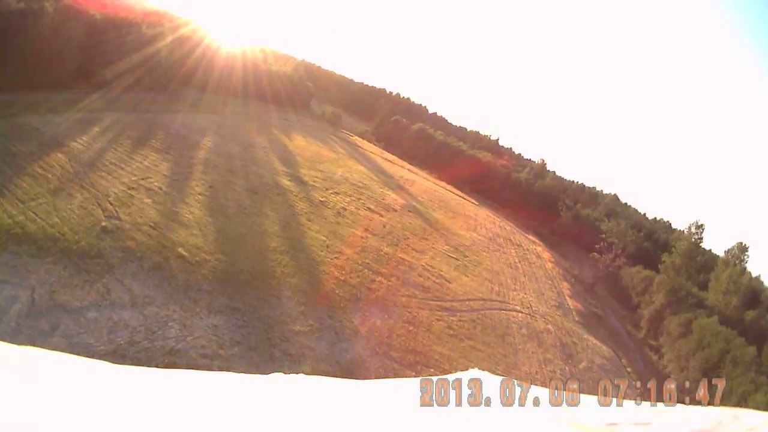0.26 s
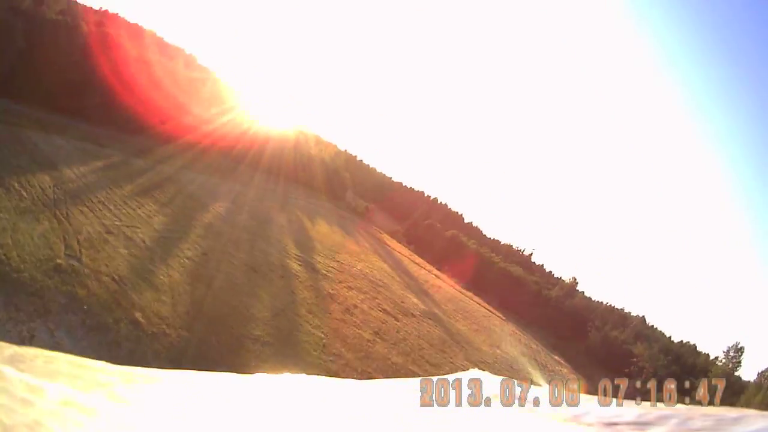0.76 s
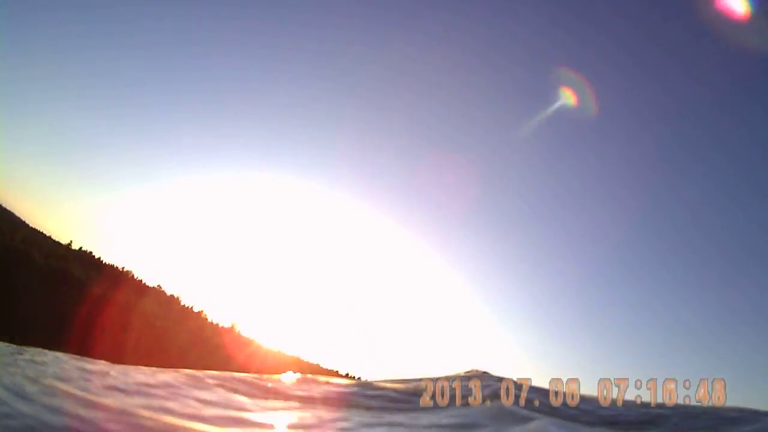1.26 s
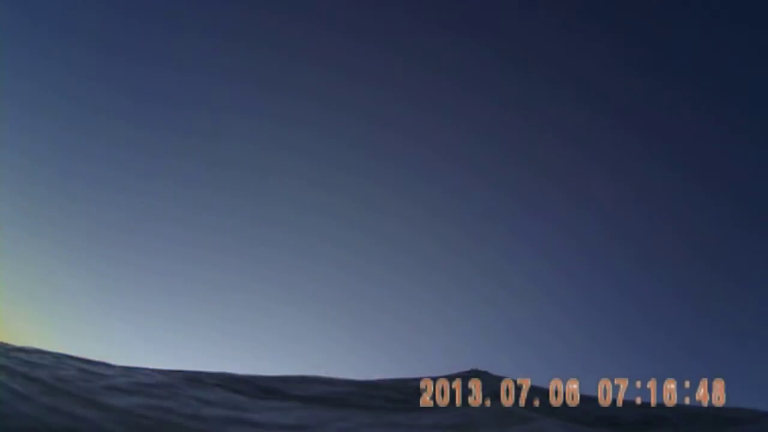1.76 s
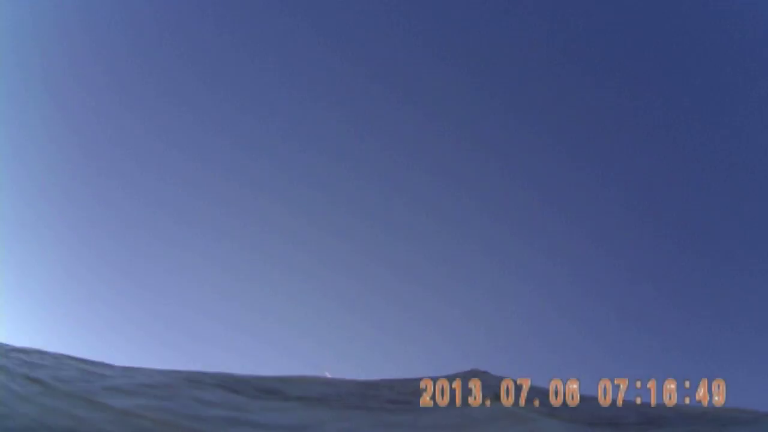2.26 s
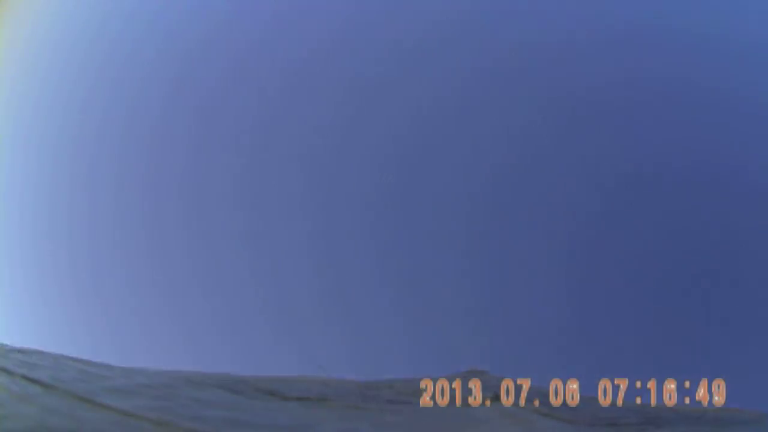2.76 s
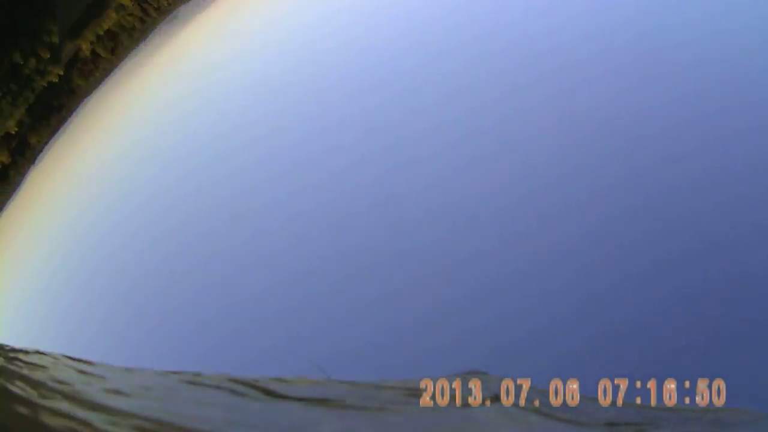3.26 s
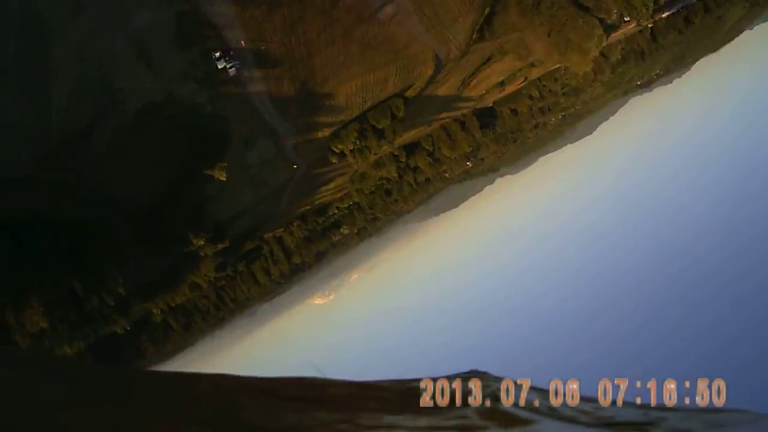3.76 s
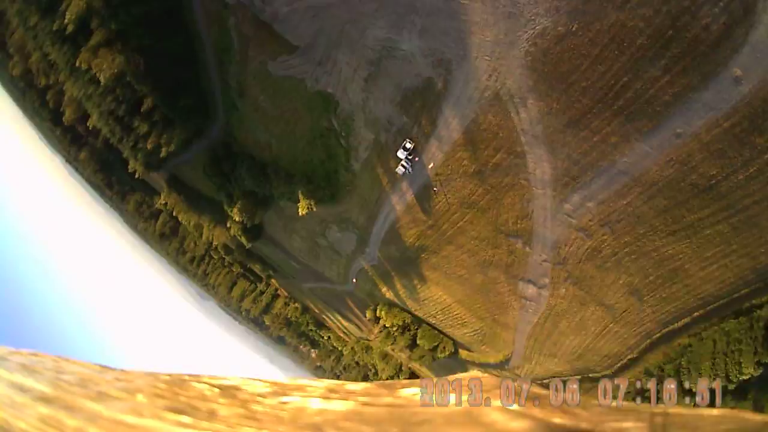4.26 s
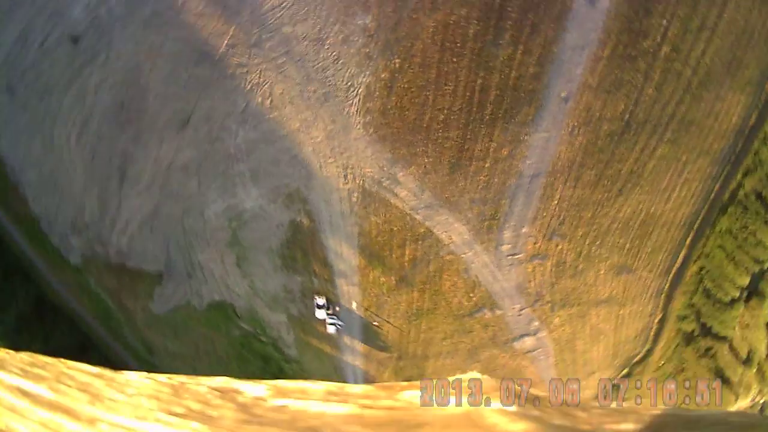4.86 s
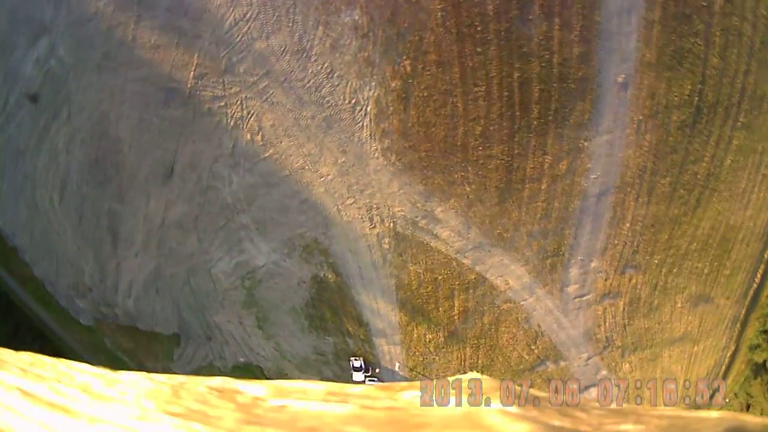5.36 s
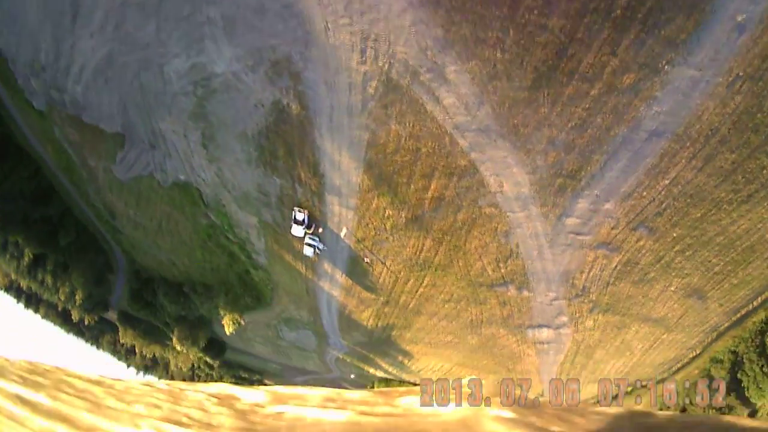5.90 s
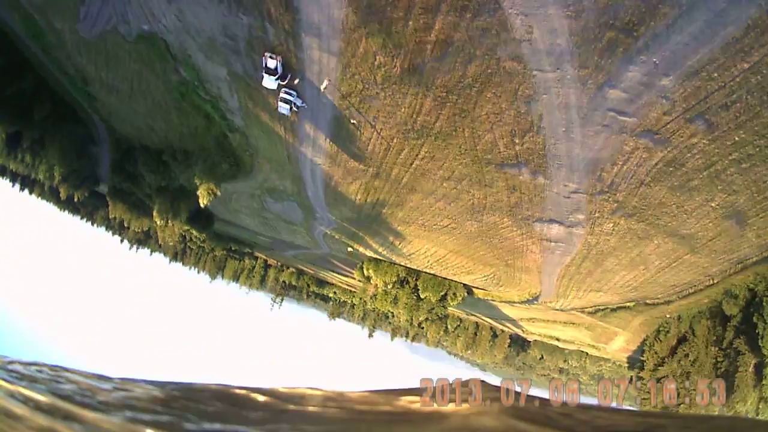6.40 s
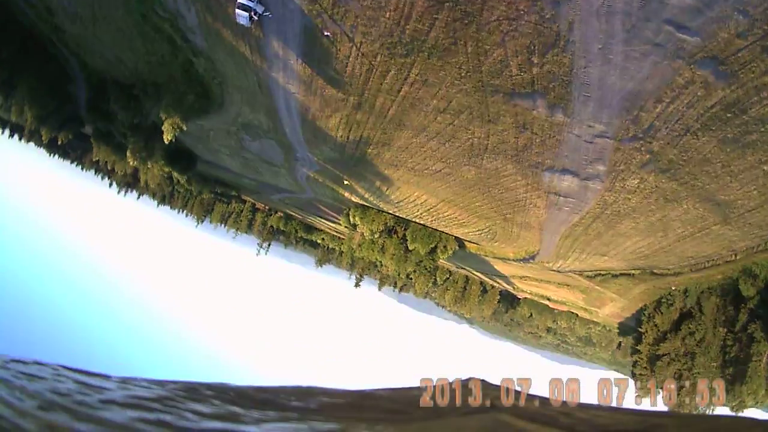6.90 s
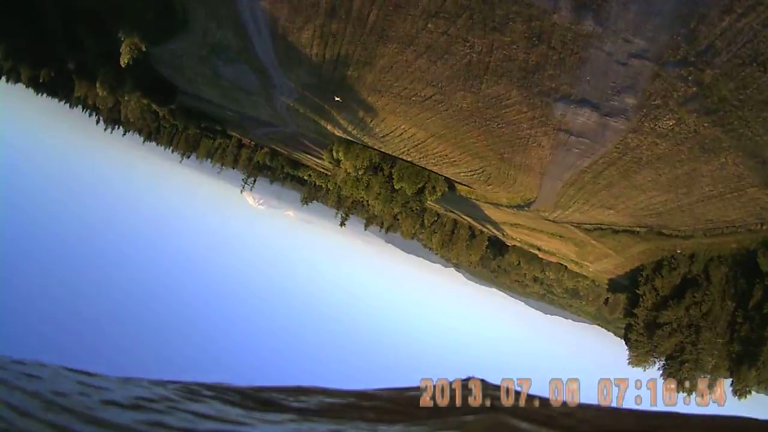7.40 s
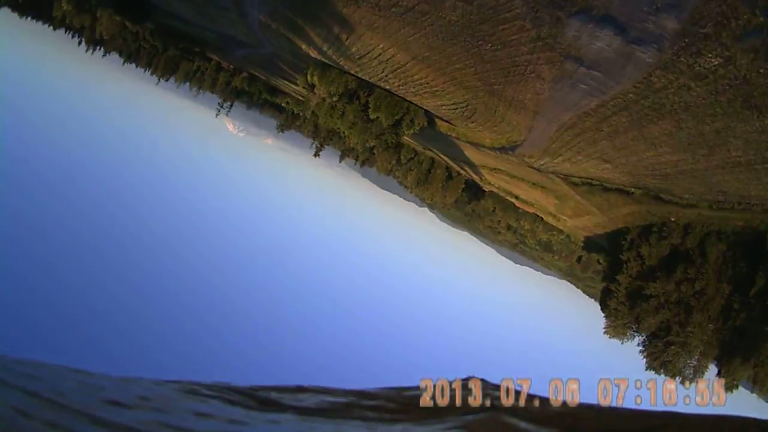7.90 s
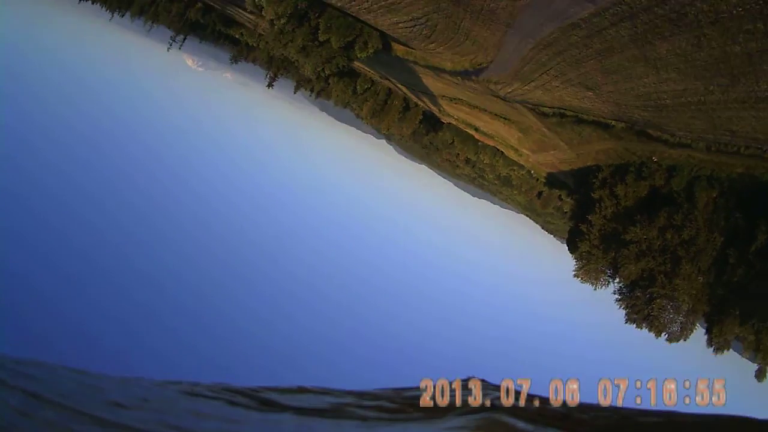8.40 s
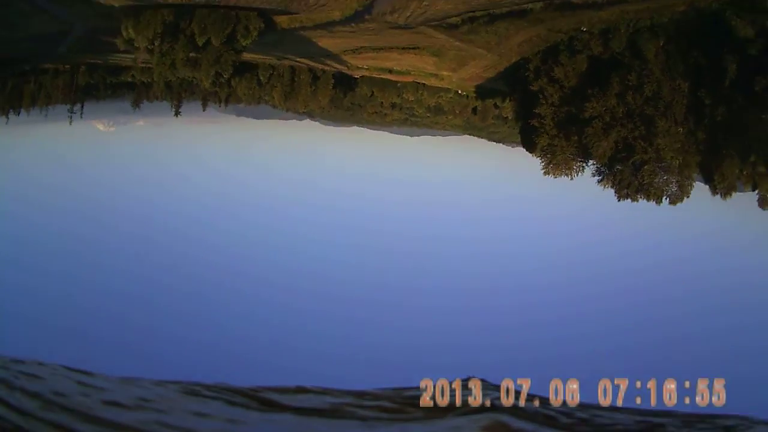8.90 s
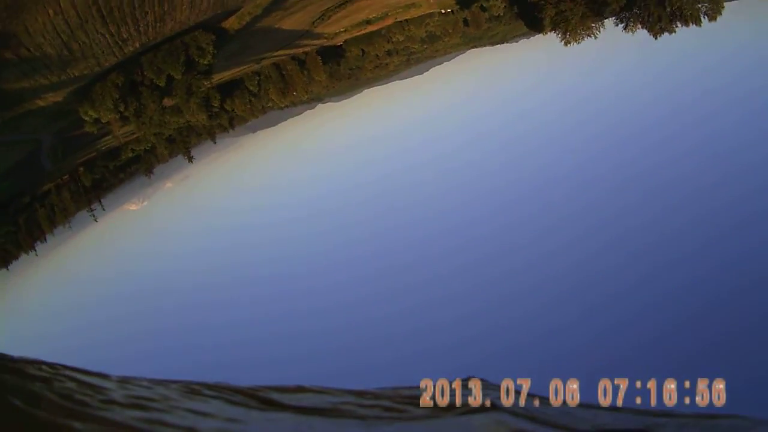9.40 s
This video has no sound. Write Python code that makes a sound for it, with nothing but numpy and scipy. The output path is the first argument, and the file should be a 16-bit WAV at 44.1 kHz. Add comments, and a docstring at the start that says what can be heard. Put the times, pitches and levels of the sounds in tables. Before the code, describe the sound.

On the wing of a small electric model aircraft, a tiny camera microphone catches a harsh propeller buzz and a rumbling rush of wind. Both weaken as the plane slows in a climb, leaving a thinner drone. The motor is throttled back to a lower pitch, the wind swells in the dive, then gradually eases. The sound is boxy and telephone-like, with faint crackle on loud peaks.

```python
"""In open air, on the wing of a small electric model aircraft in flight, heard through a tiny camera.
Each of the two propeller blades throws a sharp suction pulse, built from partials, with a puff of hiss.
The motor whines faintly and is throttled back midway through the flight.
Air rushes over the microphone as coloured noise, fading at the slow top of a climb and swelling in
the dive; the camera narrows the band, and loud peaks overload."""
import sys
import numpy as np
from scipy import signal
from scipy.fft import rfft, irfft, next_fast_len
from scipy.io import wavfile
from scipy.ndimage import uniform_filter1d

SR = 44100
rng = np.random.default_rng(int(sys.argv[2]) if len(sys.argv) > 2 else 0)


def persist_wave(psi):
    """Save psi, clipped to +-1, as 16-bit WAV."""
    counts = np.round(np.clip(psi, -1, 1) * 32767).astype(np.int16)
    wavfile.write(sys.argv[1], SR, np.atleast_2d(counts).T)


N = 425550


def from_db(db):
    """Decibels to gain."""
    return 10 ** (np.asarray(db) / 20)


def rms_one(x):
    """Scale to unit power."""
    return x / np.sqrt(np.mean(x ** 2) + 1e-20)


def in_time(rows):
    """Each column of a curve, drawn as straight lines through its times, at every sample."""
    seconds, *columns = np.transpose(rows)
    return [np.interp(np.arange(N) / SR, seconds, column) for column in columns]


def drift(rate):
    """Smooth random wander of spread 1 that changes about rate times a second."""
    # the wander runs at one fortieth of the sample rate; its first 2000 steps settle the filter
    pole = np.exp(-80 * np.pi * rate / SR)
    steps = rng.standard_normal(N // 40 + 2002)
    slow = signal.lfilter([1], [1, -2 * pole, pole * pole], steps)[2000:]
    return np.interp(np.arange(N) / 40, np.arange(len(slow)), rms_one(slow))


def coloured(x, spectrum):
    """Give a noise the spectrum of a table, nearly silent outside it; rms 1."""
    size = next_fast_len(N)
    hz, db = np.transpose(spectrum)
    bins_hz = np.maximum(np.arange(size // 2 + 1) * SR / size, 1)
    gain = from_db(np.interp(np.log(bins_hz), np.log(hz), db, left=-80, right=-80))
    return rms_one(irfft(rfft(x, size) * gain, size)[:N])


def hump(middle_s, length_s):
    """A smooth rise to 1 and fall back to 0."""
    position = (np.arange(N) / SR - middle_s) / length_s
    return np.cos(np.pi * np.clip(position, -.5, .5)) ** 2


def shaft_angle(flutter_hz, jitter_rad):
    """The shaft follows the throttle; eddies nudge its speed and the arrival of each pulse."""
    # Speed of the motor shaft. Each row: time in seconds, turns per second in Hz.
    shaft_speed = [(0, 190.5), (0.25, 190.6), (1, 189.1), (1.55, 186.0), (2.25, 181.2), (2.85, 179.3),
                   (3.95, 178.9), (4.48, 180.2), (4.62, 180.9), (4.79, 168.5), (5, 169.7), (5.13, 164.2),
                   (5.27, 163.4), (5.85, 167.7), (6.78, 168.0), (6.96, 170.7), (7.1, 171.2), (7.9, 169.7),
                   (8.7, 168.0), (9.65, 168.6)]
    turns_hz = in_time(shaft_speed)[0] + flutter_hz * drift(11.6)
    return 2 * np.pi * np.cumsum(turns_hz) / SR + jitter_rad * drift(150)


def order_db(table, order, eased):
    """Level of one shaft order between full power (0) and throttled back (1)."""
    orders, full_db, back_db = np.transpose(table)
    return (1 - eased) * np.interp(order, orders, full_db) + eased * np.interp(order, orders, back_db)


def swell_db(order):
    """How far single partials swell or fade for a moment, most as the aircraft rolls into the dive."""
    # Each row: middle in seconds, length in seconds, shaft order, lift at the middle in dB.
    swells = [(2.6, 1.6, 2, -4), (3.8, 0.98, 2, 1.5), (4.0, .4, 4, -6), (4.4, 0.93, 16, -13),
              (4.47, .7, 3, 13), (4.5, 0.83, 4, 6.5), (4.5, 1.2, 5, 11), (4.85, 0.63, 4, -8.5),
              (4.998, .9, 18, -10), (5.33, 0.52, 4, -12.5), (5.35, 0.52, 6, 6.5), (5.5, 2.5, 3, -8),
              (6.0, .7, 5, -11), (6.5, 1.2, 1, -5), (6.9, 0.27, 3, 5), (8.5, 3, 4, 3), (9.1, 0.86, 3, 5),
              (9.4, 1.8, 2, -3)]
    return sum(db * hump(s, length_s) for s, length_s, k, db in swells if round(k) == order)


def propeller(angle, wind_db, dip_db, lead_rad, smear_rad, whine_lag_rad, rough,
              drone_waver_db, waver_db, odd_waver_db):
    """Pressure builds ahead of a blade and snaps to suction as it passes: all orders dip nearly together."""
    # Drone of the low orders. Each row: shaft order, level at full power in dB,
    # level throttled back in dB, gain per dB of wind in dB.
    drone_rows = [(1, -19.5, -22.5, 0.42), (2, -23.5, -23, .13), (3, -37, -32.5, 0.2),
                  (4, -18.5, -22, 0.77), (6, -23.5, -27.5, .43)]
    # Colour of the blade pulse. Each row: shaft order, relative level at full power in dB,
    # relative level throttled back in dB.
    pulse_colour = [(7.3, 2.5, 2), (10, 0, -5), (11.8, -1, -9.5), (14.3, -4.5, -16.5), (16.6, -7, -21.5),
                    (18.33, -0.5, 3), (20.9, -3, -2), (23.1, -23, 1)]
    # Odd orders from unequal blades. Each row: shaft order, relative level at full power in dB,
    # relative level throttled back in dB.
    unequal_colour = [(5.05, -5.5, 5), (7.15, -5, -3), (9, -9.5, -12.5), (11.1, -8, -10),
                      (15.2, -12, -22.5), (19, -14, -23), (20.6, -12, -8)]
    throttle_back_s, throttle_takes_s = 4.6, 0.66
    # throttled back, the buzz holds partly (share) to its level at this wind
    cruise_db, eased_steady = -7, .55
    # level in fast flight (dB), and dB gained per dB of wind
    edge_level_db, edge_follows = -27.5, 0.58
    high_whine_db, high_whine_follows = -34, 0.78
    unequal_db = -38.5  # the difference between the blades does not depend on the wind
    wobble_lag_rad = 2.37  # the once-per-turn wobble trails the blade pulse

    eased = np.clip((np.arange(N) / SR - throttle_back_s) / throttle_takes_s, 0, 1)
    drone_db = {}
    for k, full_db, back_db, follows in drone_rows:
        drone_db[round(k)] = full_db + (back_db - full_db) * eased + follows * wind_db
    load_db = wind_db + eased_steady * eased * (cruise_db - wind_db)
    edge_db = edge_level_db + edge_follows * load_db + dip_db
    whine_db = high_whine_db + high_whine_follows * load_db

    pulses = np.zeros(N)
    for order in range(1, 23):
        # the pulse is smeared into a short upward chirp
        phase = order * angle + lead_rad - smear_rad * (order / 10 - 1) ** 2
        if order % 2 and order > 1:
            # the blades are not exactly opposite, which puts odd orders a quarter cycle behind
            phase = phase - np.pi / 2
        if order == 1:
            phase = phase - wobble_lag_rad

        if order in drone_db:
            level_db = drone_db[order] + drone_waver_db * drift(5.8)
        elif order % 2:
            level_db = unequal_db + order_db(unequal_colour, order, eased) + odd_waver_db * drift(3.6)
        elif order < 18:
            level_db = edge_db + order_db(pulse_colour, order, eased) + waver_db * drift(4)
        else:
            # on lightly loaded blades the high whine trails the pulse
            phase = phase - whine_lag_rad * eased * order
            level_db = whine_db + order_db(pulse_colour, order, eased) + waver_db * drift(1.7)
        amplitude = np.sqrt(2) * from_db(level_db + swell_db(order))
        pulses -= amplitude * np.cos(phase)
    # the blades cut through eddies, so no two pulses are equally strong
    return pulses * (1 + rough * drift(280))


def motor(angle):
    """The motor sings faintly at high multiples of its shaft speed."""
    # Thin whine of the motor itself. Each row: shaft order, level in dB.
    whine_partials = [(38, -49), (60, -54), (62, -51), (64, -50), (66, -50)]
    return sum(np.sqrt(2) * from_db(db) * np.sin(order * angle) for order, db in whine_partials)


def blade_puffs(angle, steady, sharpness, uneven):
    """White noise of even power that flares at each blade passage; one blade puffs harder."""
    flare = np.exp(sharpness * (np.cos(2 * angle) - 1))
    gate = steady + flare * (1 + uneven * np.cos(angle))
    return rng.standard_normal(N) * gate / np.sqrt(uniform_filter1d(gate ** 2, size=2048))


def airstream(angle, wind_db, inflow_db, dip_db, lumpy_db, gusty_db, steady):
    """Eddies thump on the microphone port; faster flight fills in steady hiss between the blade puffs."""
    # Noise colours: low thumping, broad rush and blade hiss.
    # Each row: frequency in Hz, relative level in dB.
    buffet_colour = [(15, -24.5), (30, -1.5), (60, 3), (110, 5.5), (180, 3.5), (280, -1), (400, -12),
                     (700, -38)]
    rush_colour = [(150, -24.5), (260, -2.5), (340, -0.5), (500, -3.5), (750, -7.5), (1100, -11.5),
                   (1400, -14), (2200, -23)]
    hiss_colour = [(700, -17), (1200, -11), (1600, -1), (2500, 4), (3200, 0.5), (3700, 2.5), (4000, 3.5)]
    # level in fast flight (dB), and dB gained per dB of wind
    buffet_level_db, buffet_follows = -15, .95
    rush_level_db, rush_follows = -18.5, 1.11
    hiss_level_db, hiss_follows = -28, 0.64

    buffet_db = buffet_level_db + buffet_follows * wind_db + lumpy_db * drift(25)
    buffet = coloured(rng.standard_normal(N), buffet_colour) * from_db(buffet_db)

    rush_db = rush_level_db + rush_follows * wind_db + gusty_db * drift(9.1)
    rush = coloured(rng.standard_normal(N), rush_colour) * from_db(rush_db)

    airspeed = from_db(wind_db / 2)  # relative to fast flight
    puffs = blade_puffs(angle, steady * airspeed, sharpness=4.3, uneven=0.34)
    hiss_db = hiss_level_db + hiss_follows * inflow_db + dip_db
    return buffet + rush + coloured(puffs, hiss_colour) * from_db(hiss_db)


def scene():
    """Propeller, motor and airstream at the wing, in open air; airspeed drives blades and air."""
    # Airspeed, as the level of the wind on the wing relative to fast flight.
    # Each row: time in seconds, level in dB.
    airspeed_curve = [(0, 0), (0.6, -0.5), (1.5, -2.5), (2, -7), (2.6, -13), (3.5, -18.5), (4.1, -15.5),
                      (4.55, -12.5), (4.851, -7.5), (5.6, -5.5), (7, -4.5), (8.4, -8), (9.65, -12)]
    blade_lag_s = 0.11  # the sound of the blades follows the wind a moment later

    angle = shaft_angle(flutter_hz=.09, jitter_rad=0.003)
    wind_db = in_time(airspeed_curve)[0]
    inflow_db = in_time([(s + blade_lag_s, db) for s, db in airspeed_curve])[0]
    # the treble dips briefly over the top of the climb
    dip_db = -0.5 * hump(middle_s=4.3, length_s=0.74)

    # the odd orders waver most
    blades = propeller(angle, inflow_db, dip_db, lead_rad=0.4, smear_rad=1.36, whine_lag_rad=.25,
                       rough=0.056, drone_waver_db=1.25, waver_db=0.74, odd_waver_db=3)
    air = airstream(angle, wind_db, inflow_db, dip_db, lumpy_db=0.78, gusty_db=1.38, steady=2.1)
    return (blades + motor(angle) + air)[None]


def record(dry):
    """The camera rounds big peaks and passes a telephone-like band; what overshoots clips with a faint crackle."""
    camera_rate_hz, camera_top_hz, cutoff_hz = 8000, 3892, 15800
    headroom, ceiling = from_db(-2.5), from_db(-2.9)

    rounded = dry / (1 + (dry / headroom) ** 8) ** (1 / 8)
    # slow sampling folds the high whine down into the band
    folded = rounded * (1 + 2 * np.cos(2 * np.pi * camera_rate_hz * np.arange(N) / SR))

    # a gentle knee, then a steep stop
    knee = signal.butter(10, camera_top_hz, fs=SR, output="sos")
    narrow = signal.sosfiltfilt(knee, folded, padtype="even")
    stop = signal.cheby2(12, 40, 4850, fs=SR, output="sos")
    narrow = signal.sosfiltfilt(stop, narrow, padtype="even")
    narrow = narrow * signal.windows.tukey(N, .0005)  # very short fades at both ends

    # only the tallest pulses reach the ceiling
    clipped = np.clip(narrow, -ceiling, ceiling)
    return signal.sosfilt(signal.cheby2(12, 70, cutoff_hz, fs=SR, output="sos"), clipped)


dry = scene()
out = record(dry)
persist_wave(out)
```